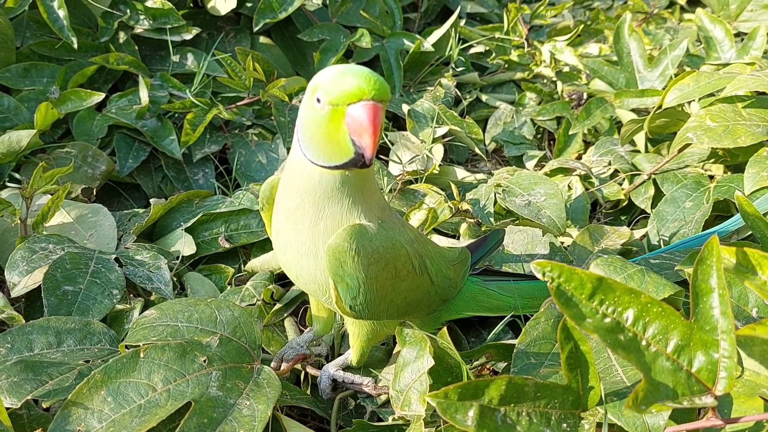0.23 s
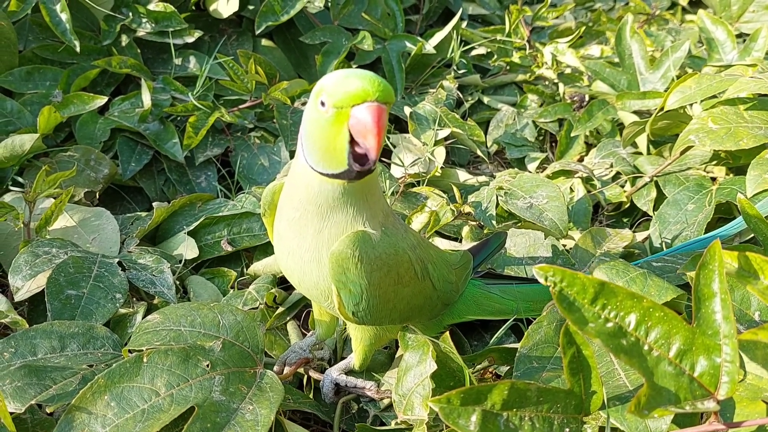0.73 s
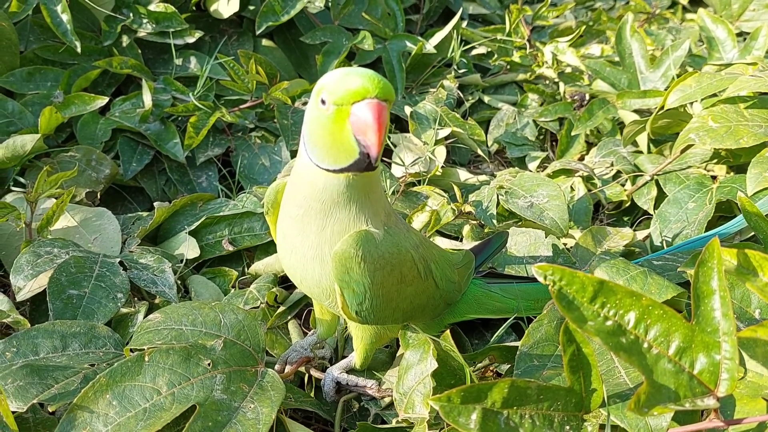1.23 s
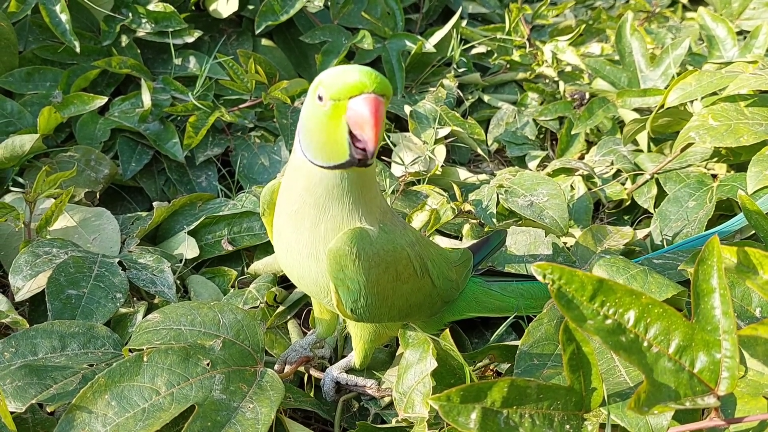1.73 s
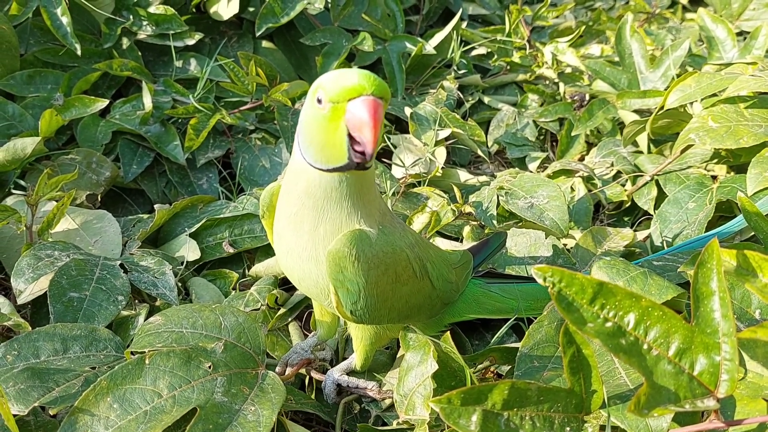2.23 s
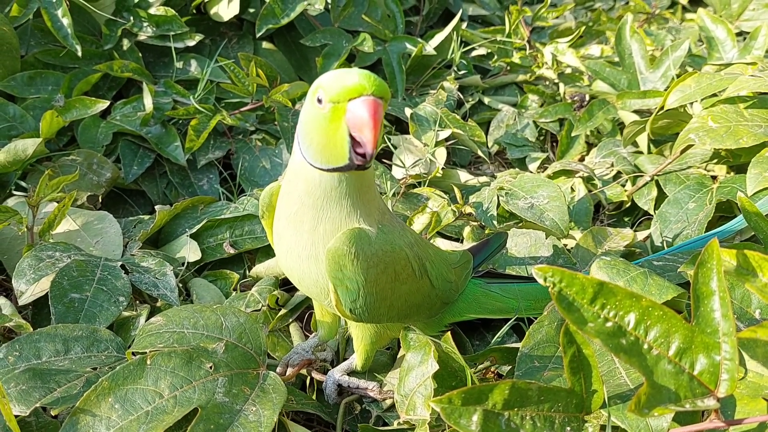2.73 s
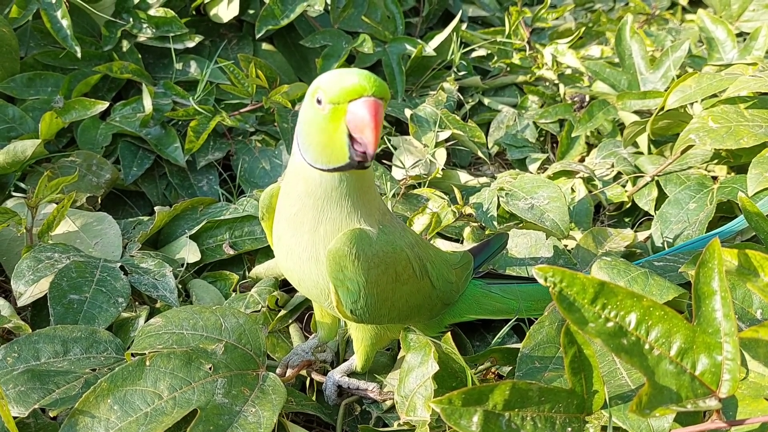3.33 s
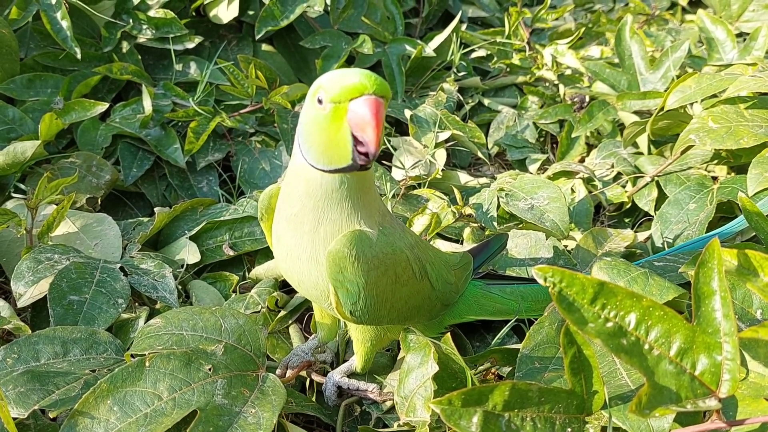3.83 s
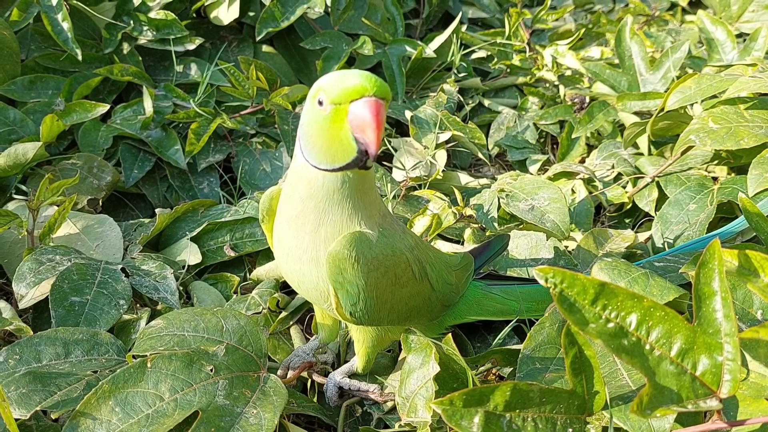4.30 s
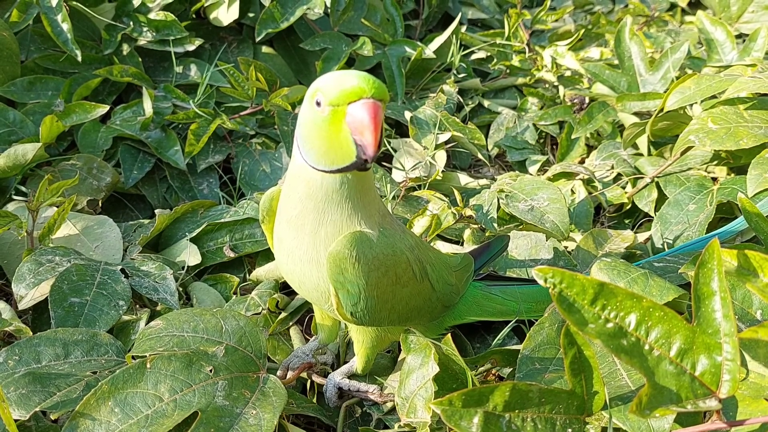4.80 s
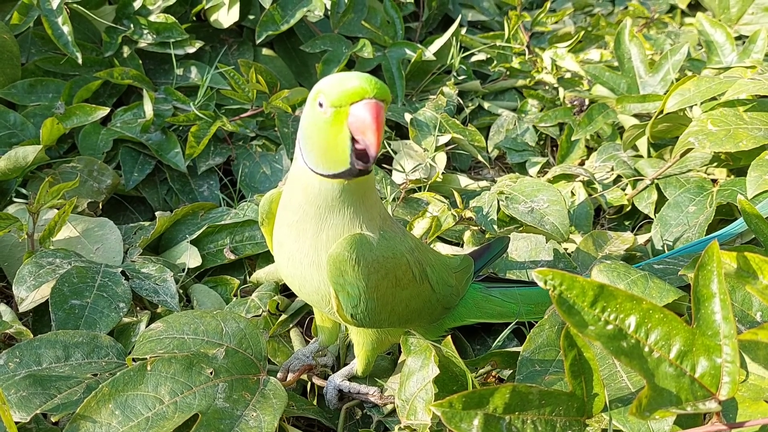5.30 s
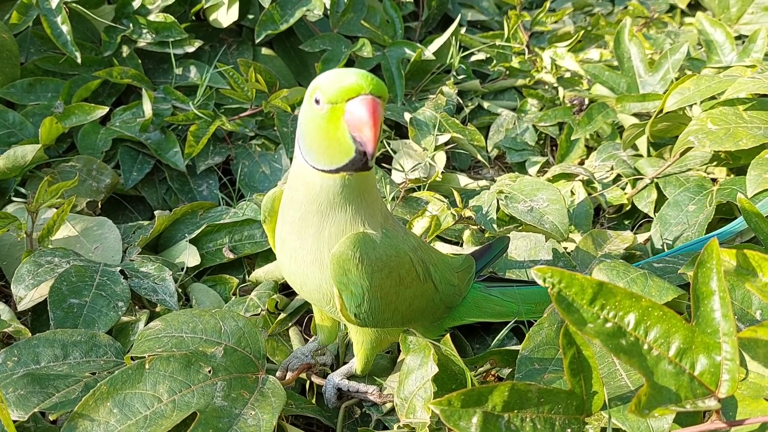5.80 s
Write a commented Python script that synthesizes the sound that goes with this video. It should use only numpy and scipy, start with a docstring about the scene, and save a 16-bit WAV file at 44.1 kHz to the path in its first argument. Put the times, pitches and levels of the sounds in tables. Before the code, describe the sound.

Outdoors among leaves, faint rustling and distant bird whistles open the scene. A close parakeet calls softly, upward then long and sagging, screeches once, and fires off a dozen sharp descending squawks about four per second, with beak ticks between. It closes with another mellow two-part call while a far bird screeches hoarsely. Traffic murmurs low underneath; the small stereo camera microphone sounds close and nearly dry.

```python
"""Two mellow rising-then-drawn-out calls of a close parakeet frame a stuttered screech and a run of falling squawks.
Beak clicks tick between them, far birds whistle, something screeches hoarsely, leaves rustle and traffic hums.
The parakeet's voice is a fundamental plus overtones shaped by a throat; clicks are crackle that rings the mouth.
Far birds are gliding sine waves, engines are wavering low tones, and leaves, roar and air are coloured noise.
All of it reaches a two-port camera microphone in a bush, with short echoes."""
import sys
import numpy as np
from scipy import signal
from scipy.fft import rfft, irfft, next_fast_len
from scipy.io import wavfile
from scipy.ndimage import map_coordinates

SR = 44100
rng = np.random.default_rng(int(sys.argv[2]) if len(sys.argv) > 2 else 0)


def output_pcm(signal):
    """Save a mono or channel-first signal as 16-bit PCM at the path in sys.argv[1].

    Samples are clipped to [-1, 1] before scaling.
    """
    pcm = np.clip(np.atleast_2d(signal).T, -1, 1) * 32767
    wavfile.write(sys.argv[1], SR, np.round(pcm).astype(np.int16))


N = 266893
T = np.arange(N) / SR  # time of every sample, in seconds

# Levels in the tables are relative: the mix adds its own gains.

# Rising mellow calls, beak a little open. Each row: start in seconds, length in seconds, top pitch in Hz, level in dB.
RISES = [(0.47, .158, 886.7, -20.5), (5.069, .162, 897.4, -20)]
# Shape of every rising call. Each row: share of the length, pitch over the top pitch, effort relative to the level in dB.
RISE_SHAPE = [(0, .44, -49.5), (.2, .68, -43), (.26, .8, -44.5), (0.312, 0.91, -40), (.45, .89, -24),
              (0.621, 0.93, -6), (.9, 1, -1), (0.949, 0.95, -10.5), (1, 1, -36.5)]
# Drawn-out mellow calls, beak nearly shut, one list per call. Each row: time in seconds, pitch in Hz.
DRAWN = [
    [(0.786, 960.6), (0.792, 958), (0.822, 852.5), (0.836, 839.3), (0.876, 759), (0.986, 712),
     (1.056, 735.2), (1.12, 735), (1.176, 710.2), (1.208, 633)],
    [(5.385, 862.3), (5.443, 774.2), (5.495, 724.3), (5.563, 698.7), (5.609, 707.7), (5.721, 735.6),
     (5.757, 715), (5.767, 704), (5.788, 639.4)],
]
# How slowly each drawn-out call swells in: one time constant per call, in seconds.
DRAWN_ATTACK_S = [.008, .05]
# In drawn-out calls effort follows pitch: level at the resting pitch, slope, highest level, softening at the start.
REST_HZ, REST_DB, EFFORT_DB_PER_HZ, FULL_DB, ATTACK_DB = 738.8, -25, 0.11, -19.5, 14
# The fundamental of a mellow call moves less than the effort; softer notes are rougher.
FIRST_DB, FIRST_FOLLOWS, FIRST_LEAST_DB = -44, 0.49, -61
MELLOW_ROUGH, SOFT_ROUGH_PER_DB = .05, 0.05

# The screech, beak open: a thin rising lead, then a falling end.
# Each row: time in seconds, pitch in Hz, fundamental in dB, overtones in dB, roughness from 0 to 1.
SCREECH = [
    [(1.424, 2554, -62.5, -42.5, .3), (1.432, 3405, -52.5, -33.5, .3), (1.441, 4500, -50, -46, .3)],
    [(1.471, 1986, -23.5, -14, .3), (1.478, 1498, -28, -9.5, .2), (1.488, 1269, -30, -5, .25),
     (1.497, 1200, -24, -8.5, .25), (1.505, 817, -41.5, -10, 0.3), (1.511, 552.4, -35.5, -21, 0.7),
     (1.522, 407, -39.5, -28.5, .5), (1.53, 379.2, -53, -25.5, .5)],
]
# Stutters inside the screech, each an arch in pitch and level.
# Each row: start in seconds, length in seconds, top pitch in Hz, level in dB, how much lower the edges are in dB.
STUTTERS = [(1.445, .012, 2357, -0.5, 23.5), (1.459, .01, 2239, -9, 4)]
STUTTER_EDGE, STUTTER_FIRST_DB = .62, -18.5  # edge pitch over top pitch; fundamental against overtones

# Squawks with their clicks. Each row: start in seconds, how long the top is held in seconds, length in seconds,
# top pitch in Hz, bottom pitch in Hz, level in dB, seconds from beak snap to squawk, snap in dB,
# seconds from tick to squawk, tick in dB.
SQUAWKS = [(1.7037, .0063, 0.078, 2546, 818, -24.5, .0348, -23.5, .0053, -26),
           (1.957, .0097, 0.084, 2456, 863.3, -24.5, .0314, -31, 0.0029, -22.5),
           (2.2162, .0098, 0.076, 2506, 767.6, -26.5, .0358, -35.5, .0051, -28.5),
           (2.478, .0059, .077, 2468, 759.7, -25.5, .0405, -25.5, .007, -23),
           (2.7442, .0088, 0.082, 2482, 781.4, -23.5, .0379, -35, 0.0089, -26.5),
           (3.0125, .0104, .081, 2444, 816.8, -23.5, .0348, -28, .0064, -25),
           (3.2896, .0085, .086, 2436, 828.8, -24.5, .0382, -30, .0086, -23.5),
           (3.5615, .0088, .082, 2476, 821, -24.5, .0419, -40.5, .0059, -24.5),
           (3.8644, .0079, .081, 2569, 819.2, -23.5, .0346, -26.5, .006, -34),
           (4.153, .0099, 0.086, 2568, 831.8, -23.5, .036, -32, .0063, -27),
           (4.4346, .011, 0.085, 2436, 829.5, -22, .0365, -30, .0039, -19),
           (4.7061, .0083, 0.083, 2482, 813.5, -22.5, .0342, -30, 0.0065, -23)]
# Shape of every squawk. Each row: share of the glide time, share of the pitch drop, fundamental in dB,
# overtones in dB, roughness from 0 to 1.
GLIDE = [(-.15, -.01, 0, 4.5, .06), (0, .014, 0.5, 6, .06), (.06, .055, 1, 6, .1), (.12, .13, -11, 0.5, .1),
         (.3, .39, -8.5, 7, .3), (.58, .65, -11, 4.5, .35), (.7, .73, -10, 4, .4), (.8, .84, -13.5, -1, .5),
         (1, .93, -17.5, -1, .5), (1.2, 0.95, -10.5, -6, .4)]
GLIDE_S = .065  # time a squawk takes to fall

# Throat response with the beak open. Each row: frequency in Hz, gain in dB.
OPEN = [(500, -40.5), (1800, -21), (2500, -14), (3400, -5.5), (4100, -17), (4900, 0), (6000, -14.5),
        (7300, -20.5), (8800, -34), (10000, -28.5), (12000, -42), (14500, -44.5), (16000, -52.5)]
# Throat response with the beak nearly shut. Each row: frequency in Hz, gain in dB.
SHUT = [(500, -16), (1450, -9), (1900, -5), (2550, 4), (3050, -23.5), (3700, -24.5), (4400, -23),
        (4950, -34), (5400, -32.5), (6200, -30.5), (7400, -28.5), (9000, -34.5), (12000, -47.5),
        (16000, -54)]
# Throat response of the rising calls, beak a little more open. Each row: frequency in Hz, gain in dB.
AJAR = [(500, -13.5), (1300, -6), (1900, -10.5), (2550, 4), (3050, -18.5), (3550, -9.5), (4400, -27),
        (5300, -14), (6200, -28.5), (7200, -21.5), (9000, -39.5), (16000, -56)]
# Air rushing through the open beak. Each row: frequency in Hz, level against the overtones in dB.
OPEN_AIR = [(1000, -68), (6000, -42), (10500, -35.5), (13000, -41.5), (15000, -41.5), (16500, -51)]
# Air rushing through the nearly shut beak. Each row: frequency in Hz, level against the overtones in dB.
SHUT_AIR = [(1000, -46), (3500, -35), (5000, -29), (7000, -46.5), (9000, -42.5), (11500, -43), (13000, -70),
            (16500, -73.5)]

# Short chips before the drawn-out calls. Each row: start in seconds, start pitch in Hz, end pitch in Hz,
# length in seconds, level in dB.
CHIPS = [(0.7645, 2093, 3196, 0.0055, -11), (5.356, 2560, 2476, 0.0035, -12)]
# Beak clicks apart from the snaps and ticks. Each row: time in seconds, level in dB, brightness in dB.
CLICKS = [(0.7647, -21, -1), (1.2728, -52, 4), (1.3718, -57, -5), (1.4248, -40, 8.5), (1.6294, -49, 7),
          (1.8235, -53, 8), (1.8593, -44, 11), (2.1199, -49, 1), (2.3612, -50.5, 5), (2.5925, -49, -1),
          (2.6433, -46, 18), (2.922, -53, 14.5), (3.1284, -47, -8.5), (3.1721, -52, 10), (3.4047, -48, -16),
          (3.4163, -43.5, -14), (3.6545, -37, -4), (3.7154, -52.5, 10), (4.2492, -32, -7),
          (4.5531, -45.5, -12.5), (4.8296, -49, -6), (4.8764, -49, 10.5), (5.332, -27.5, -3),
          (5.3556, -20.5, -7.5), (5.8384, -51, 0.5)]
# Resonances of the mouth. Each row: frequency in Hz, width in Hz, gain in dB.
MOUTH_MODES = [(422, 110, -6), (1173, 150, -3), (1620, 170, -2.5), (2500, 170, -2.5), (3390, 220, -1.5),
               (4320, 120, -4.5), (4400, 540, -2.5), (5950, 280, -6.5), (7400, 340, 6), (9500, 1500, -14.5)]
SNAP_BRIGHT_DB, TICK_LOW_DB, TICK_HIGH_DB = -8.5, -22, -22
TICK_LOW_DB = -22.5
LOW_PART_DB, HIGH_PART_DB = -15, -17  # at brightness 0; brighter clicks trade low for high

# A clear far bird, arched notes. Each row: start in seconds, length in seconds, start, middle and end pitch in Hz,
# loudest moment as a share of the length, then the level of four partials in dB.
PIPES = [(0, .275, 1467, 1497, 1518, 0.57, -54, -100, -87, -100),
         (0.628, 0.16, 1262, 1370, 1296, 0.38, -60, -75, -88, -110),
         (1.535, .055, 1531, 1400, 1200, 0.33, -66, -57.5, -89, -88),
         (2.045, 0.13, 1297, 1360, 1276, 0.31, -62.5, -90, -72.5, -85),
         (2.34, 0.12, 1078, 1363, 1330, 0.74, -61.5, -77.5, -63.5, -76),
         (3.48, 0.073, 1101, 1150, 1201, 0.53, -71.5, -90, -74, -100),
         (3.77, 0.054, 1055, 1072, 1082, 0.48, -72, -90, -95, -100),
         (4.111, .035, 1201, 1160, 1133, 0.29, -71, -85, -82.5, -100)]
# The hoarser far bird, arched notes. Each row: start in seconds, length in seconds, start, middle and end pitch in Hz,
# loudest moment as a share of the length, then the level of three partials in dB.
SLURS = [(.625, .04, 3550, 3507, 3457, .2, -58.5, -91.5, -100),
         (1.17, .024, 1502, 1800, 1923, 0.91, -77, -62.5, -90),
         (1.194, 0.14, 1924, 1694, 1300, 0.26, -64.5, -60.5, -92),
         (1.56, 0.054, 2023, 1870, 1702, .4, -93, -62.5, -88.5),
         (3.455, 0.056, 1830, 1740, 1664, .2, -97, -67.5, -98),
         (4.975, 0.05, 3590, 3530, 3240, 0.87, -52, -78, -100),
         (5.24, 0.066, 1314, 2490, 2350, 0.74, -54.5, -73, -96)]
NOTE_FADE_DB = 11.5  # arched notes: softer by this much one length away from the loudest moment
# Far calls that drop to a step and fall off it. Each row: start in seconds, length in seconds, step pitch in Hz,
# then the level of three partials in dB.
DROPS = [(0.657, 0.096, 1896, -58, -50.5, -97), (.938, 0.11, 1830, -52.5, -50, -98),
         (5.026, .098, 1900, -56, -49.5, -70), (5.303, 0.089, 1844, -56, -51, -76)]
# Shape of every dropping call. Each row: share of the length, pitch over the step pitch.
DROP_SHAPE = [(0, 1.24), (.12, 1.1), (.3, 1), (.8, .97), (1, 0.76)]
NOTE_EDGE_DB = 7  # dropping calls are this much softer at both ends

# A far hoarse screech: hiss, low band and high band. Each row: start of the loudest part in seconds, level in dB,
# swell in dB per second, fade in dB per second, how long it holds in seconds.
RASP = [(5.62, -43, 134, 349, 0.18), (5.648, -43, 75.5, 140, 0.11), (5.62, -39.5, 221, 140, 0.036)]
# Colour of its hiss. Each row: frequency in Hz, gain in dB.
RASP_COLOUR = [(500, -34), (1200, -10.5), (2300, -1), (2800, -17), (3400, -15), (4800, -11), (6200, -25),
               (9000, -31.5), (11500, -35), (13000, -63), (16000, -89)]
# Colours of its low and high band, one list each. Each row: frequency in Hz, gain in dB.
RASP_BANDS = [
    [(900, -93), (1500, -47.5), (2100, -6), (2350, 2.5), (2650, -7), (3400, -50), (5000, -91)],
    [(1600, -88), (2400, -40), (3000, -6), (3400, -3), (3750, -7), (4600, -33), (6500, -88)],
]
# Bursts of leaf rustle. Each row: start in seconds, length in seconds, level in dB.
RUSTLE = [(0, 0.067, -77), (0.07, 0.045, -71), (0.139, 0.036, -69.5), (0.175, 0.046, -70),
          (.24, .04, -75.5), (0.287, 0.031, -72), (0.338, .028, -69.5)]
# Colour of the leaves. Each row: frequency in Hz, gain in dB.
LEAVES = [(2060, -55.5), (3500, -29), (4360, -26), (4440, -4), (4900, -25), (5800, -19), (5970, -13),
          (8260, 1.5), (10500, -23.5), (14000, -22.5)]

# Traffic rumble over time. Each row: time in seconds, level in dB.
TRAFFIC = [(0.0, -62), (1.01, -60.5), (1.28, -64), (1.6, -63), (2.34, -68.5), (2.88, -69.5), (3.18, -63.5),
           (3.62, -69.5), (4.31, -63), (4.57, -69.5), (5.61, -58), (6.05, -67.5)]
# Colour of the rumble. Each row: frequency in Hz, gain in dB.
RUMBLE = [(21, -46), (35, -6), (97, 0.5), (198, -10), (263, -24), (301, -26), (369, -34.5), (400, -31),
          (520, -49.5), (880, -120)]
# An engine that speeds up, then slows. Each row: time in seconds, firing rate in Hz, level in dB.
ENGINE = [(0, 45.53, -59), (0.499, 48.8, -66), (1.049, 51.67, -58.5), (1.3, 51.74, -70.5),
          (1.598, 53, -63.5), (1.73, 51.2, -55), (2, 47.1, -80)]
# Multiples of the firing rate that are heard. Each row: multiple, level in dB.
ENGINE_ORDERS = [(2, -0.5), (3, -6.5), (4, -11.5)]
# Hums of farther engines, in two groups. Each row: start in seconds, length in seconds, pitch in Hz, level in dB.
HUMS = [
    [(0, 2.85, 121.2, -73), (2.9, 0.64, 121, -67.5), (3.8, 0.8, 124, -66), (4.6, 1.447, 121, -67.5)],
    [(1.97, 0.214, 157, -58.5), (4.85, 1.186, 173, -66.5)],
]
ROAR_DB, PASS_S, PASS_WIDE_S, PASS_DB = -79, 4.42, 0.14, 20  # a roar that swells once: when, how wide, how much
# Colour of the quiet air. Each row: frequency in Hz, gain in dB.
AIR = [(180, -15.5), (300, 5), (645, -7.5), (1300, -1.5), (1930, -9.5), (3240, -14.5), (4750, -13),
       (5520, -16), (8360, -11.5), (10600, -20), (16000, -19)]
AIR_DB = -72

# Shading between the ports. Each row: frequency in Hz, left over right in dB.
SHADE = [(300, 5.5), (1400, -1.5), (2400, 7.5), (3100, 5.5), (3800, 24), (4500, 5), (5900, 9), (8000, 7),
         (10000, 0.5), (11400, 10), (14000, -2)]
# Lead of the left port. Each row: frequency in Hz, phase lead in radians.
LEAD = [(0, 0), (1000, 1.1), (1700, 2), (2400, 2.7), (3400, 3.1), (5200, 4.4), (6500, 5), (8600, 7.4),
        (11400, 8.5), (16000, 12)]
# Echo of the bush. Each row: frequency in Hz, time to die away by 60 dB in seconds.
BUSH = [(500, 0.078), (2000, .14), (5000, 0.1), (12000, 0.031)]
# A fainter, longer answer from farther off. Each row: frequency in Hz, time to die away by 60 dB in seconds.
WALLS = [(800, .25), (3000, 0.38), (8000, .25)]
# Echo around the far birds. Each row: frequency in Hz, time to die away by 60 dB in seconds.
GARDEN = [(500, .08), (1600, .1), (4000, .22), (12000, .15)]
TOP_HZ = 16200  # band limit of the camera


def amp(db):
    """Turn dB into gain."""
    return 10 ** (np.asarray(db) / 20)


def unit(x):
    """Scale to an average (rms) strength of 1."""
    return x / np.sqrt(np.mean(x ** 2) + 1e-20)


def along(points, hz):
    """Read a curve of (Hz, value) points on a logarithmic frequency axis."""
    f, v = np.transpose(points)
    return np.interp(np.log(hz + 1), np.log(f + 1), v)


def filtered(x, response):
    """Filter x by multiplying its spectrum with a response, a function of frequency."""
    size = next_fast_len(N + 8192)  # spare room at the end for ringing
    return irfft(rfft(x, size) * response(np.fft.rfftfreq(size, 1 / SR)), size)[..., :N]


def causal(points):
    """A response that follows the (Hz, dB) points and rings only after the sound (minimum phase)."""
    def response(hz):
        cepstrum = irfft(np.log(amp(along(points, hz))))
        half = len(cepstrum) // 2
        cepstrum[1:half] *= 2
        cepstrum[half + 1:] = 0
        return np.interp(hz, np.linspace(0, SR / 2, half + 1), np.exp(rfft(cepstrum)))
    return response


def wobble(rate):
    """A smooth random curve with this many random points a second."""
    return map_coordinates(rng.standard_normal(int(N * rate / SR) + 4), [T * rate])


def noise(colour, channels=1):
    """Coloured noise of rms 1."""
    white = rng.standard_normal((channels, N))
    return unit(filtered(white, lambda hz: amp(along(colour, hz))))


def turning(hz):
    """The phase of a tone whose pitch changes: it turns faster when the pitch is higher."""
    return 2 * np.pi * np.cumsum(hz) / SR


def played(notes, fade):
    """A gate that is open during the notes, and each note column as one value per sample."""
    s, *columns = np.transpose(np.concatenate(notes))
    gate = sum(np.clip(np.minimum(T - n[0][0], n[-1][0] - T) / fade, 0, 1) for n in notes)
    return gate, [np.interp(T, s, column) for column in columns]


def voice(notes, throat, air, fade, jitter, breathy, crisp_hz, spread):
    """The syrinx: a strong fundamental, and a pulse each cycle that rings the throat; rough pulses scatter and hiss."""
    gate, (hz, first_db, over_db, rough) = played(notes, fade)
    rough = np.clip(rough, 0, 1)
    phase = turning(hz * (1 + jitter * rough * wobble(500) + .05 * rough * wobble(110)))
    on = gate > 0
    pulses = np.zeros(N)
    # the membranes close gradually: the pulse is drawn out, and its top is lost in the hiss
    unsteady = wobble(45)
    for k in range(2, 16):
        drift = amp(.5 * (k - 1) * np.roll(unsteady, 9001 * k)[on])  # higher partials fade in and out more
        rolloff = 1 + (k * hz[on] / crisp_hz) ** 10
        pulses[on] += drift * np.cos(k * phase[on] + spread * k * k) / rolloff
    hiss = breathy * rng.standard_normal(N) * (1 + 1.5 * np.cos(phase))  # air bursts once a cycle
    source = pulses * (1 + .6 * rough * wobble(900)) + rough * hiss
    first = amp(first_db) * (1 + 0.15 * rough * wobble(400)) * np.sqrt(2) * np.cos(phase)
    effort = gate * amp(over_db)
    rush = filtered(effort * rng.standard_normal(N), lambda f: amp(along(air, f)))
    return gate * first + filtered(effort * source, causal(throat)) + rush


def mellow_note(s, hz, effort_db):
    """A mellow note: its fundamental and roughness follow from the effort."""
    first_db = np.maximum(FIRST_DB + FIRST_FOLLOWS * (effort_db - REST_DB), FIRST_LEAST_DB)
    rough = np.clip(MELLOW_ROUGH + SOFT_ROUGH_PER_DB * (REST_DB - effort_db), .03, .1)
    return np.transpose([s, hz, first_db, effort_db, rough])


def mellow_calls():
    """Each rising call is followed by a drawn-out one whose effort follows its pitch."""
    u, pitch, below_db = np.transpose(RISE_SHAPE)
    notes = []
    for (s, length, top_hz, db), drawn, attack in zip(RISES, DRAWN, DRAWN_ATTACK_S):
        t = np.linspace(drawn[0][0], drawn[-1][0], num=80)
        hz = np.interp(t, *np.transpose(drawn))
        effort_db = np.minimum(REST_DB + EFFORT_DB_PER_HZ * (hz - REST_HZ), FULL_DB)
        effort_db = effort_db - ATTACK_DB * np.exp((t[0] - t) / attack)
        notes.append(mellow_note(s + u * length, top_hz * pitch, db + below_db))
        notes.append(mellow_note(t, hz, effort_db))
    return notes


def stutter(s, length, top_hz, db, edge_db):
    """One short burst of the screech: pitch and level arch up and down, rougher at the edges."""
    edge = np.array([1, 0, 1])
    t = s + length * np.array([0, .5, 1])
    over_db = db - edge_db * edge
    return np.transpose([t, top_hz * STUTTER_EDGE ** edge, over_db + STUTTER_FIRST_DB, over_db, .25 + .15 * edge])


def squawk(s, held, length, top_hz, bottom_hz, db):
    """One squawk as a note: a held top, then the shared falling shape, swelling in and choked off."""
    t = np.linspace(-.003, length + 0.0043, num=90)
    u, *shape = np.transpose(GLIDE)
    drop, first_db, over_db, rough = (np.interp((t - held) / GLIDE_S, u, column) for column in shape)
    swell_db = 18 * np.clip(1 - (t + 0.0013) / 0.0014, 0, 1) ** 2
    choke_db = 24 * np.clip(1 - (length + 0.0031 - t) / 0.02, 0, 1) ** 2
    level_db = db - swell_db - choke_db
    hz = top_hz * (bottom_hz / top_hz) ** drop
    return np.transpose([s + t, hz, first_db + level_db, over_db + level_db, rough])


def parakeet():
    """Mellow calls ring the nearly shut beak; the screech and squawks ring the open one."""
    calls = mellow_calls()  # rising and drawn-out ones take turns
    mellow = sum(voice(calls[k::2], throat, SHUT_AIR, fade=.005, jitter=0.066, breathy=2.47, crisp_hz=5288, spread=0.19)
                 for k, throat in enumerate((AJAR, SHUT)))
    harsh_notes = SCREECH[:1] + [stutter(*row) for row in STUTTERS] + SCREECH[1:]
    harsh_notes = harsh_notes + [squawk(*row[:6]) for row in SQUAWKS]
    harsh = voice(harsh_notes, OPEN, OPEN_AIR, fade=0.00082, jitter=0.051, breathy=3.6, crisp_hz=9160, spread=0.38)
    return amp(4) * mellow + amp(1.5) * harsh


def chips():
    """Each chip is a single swelling and dying glide with a weak second partial."""
    out = np.zeros(N)
    for s, start_hz, end_hz, length, db in CHIPS:
        u = np.linspace(0, 1, round(length * SR))
        phase = turning(start_hz + (end_hz - start_hz) * u)
        swell = np.sin(np.pi * u ** 1.2) ** 0.57
        out[round(s * SR):][:len(u)] += amp(db) * swell * (np.sin(phase) + 0.13 * np.sin(2 * phase))
    return out


def clicks():
    """All clicks as (time, level, low part, high part): a dull snap and a tick lead into every squawk."""
    snaps = [(s - before, db, SNAP_BRIGHT_DB) for s, *_, before, db, _, _ in SQUAWKS]
    ticks = [(s - before, db, TICK_LOW_DB, TICK_HIGH_DB) for s, *_, before, db in SQUAWKS]
    return [(s, db, LOW_PART_DB - bright, HIGH_PART_DB + bright) for s, db, bright in CLICKS + snaps] + ticks


def beak():
    """Each click is a faint creak, then a brief dying crackle that rings the low, middle and high modes of the mouth."""
    s, db, low_db, high_db = np.transpose(clicks())
    t = np.arange(-130, 260) / SR
    envelope_db = np.where(t < 0, -20 + 2500 * t, -60 * t / 0.0038)
    crackle = rng.standard_normal((len(s), len(t))) * amp(envelope_db)
    at = np.round((s[:, None] + t) * SR).astype(int).ravel()
    low, middle, high = MOUTH_MODES[:3], MOUTH_MODES[3:8], MOUTH_MODES[8:]
    out = 0
    for level, modes in ((db + low_db + 23.5, low), (db + 17.0, middle), (db + high_db + 20.0, high)):
        def ring(f):
            # neighbouring modes have opposite signs
            return sum((-1) ** k * amp(gain) * 1j * f * width / (centre ** 2 - f * f + 1j * f * width)
                       for k, (centre, width, gain) in enumerate(modes))
        struck = np.bincount(at, (amp(level)[:, None] * crackle).ravel(), N)
        out = out + filtered(struck, ring)
    return out


def arched(s, length, start_hz, mid_hz, end_hz, loudest, *levels):
    """A note whose pitch bends smoothly through three values."""
    u = np.linspace(-1, 1, num=15)
    share = (u + 1) / 2
    hz = mid_hz + (end_hz - start_hz) / 2 * u + ((start_hz + end_hz) / 2 - mid_hz) * u ** 2
    return np.transpose([s + length * share, hz] + [db - NOTE_FADE_DB * np.abs(share - loudest) for db in levels])


def dropped(s, length, step_hz, *levels):
    """A note with the shared stepped fall."""
    u, pitch = np.transpose(DROP_SHAPE)
    return np.transpose([s + length * u, step_hz * pitch] + [db - NOTE_EDGE_DB * (2 * u - 1) ** 2 for db in levels])


def far_bird(notes, haze):
    """A slightly unsteady, hoarse whistle with overtones that flutter through the foliage."""
    gate, (hz, *levels) = played(notes, .008)
    phase = turning(hz * (1 + .005 * wobble(150)))
    hoarse = 1 + haze * wobble(1400)  # spreads a haze around each partial
    partials = sum(np.sqrt(2) * amp(db + 1.5 * wobble(60)) * np.sin(k * phase) for k, db in enumerate(levels, 1))
    return gate * hoarse * partials


def far_birds():
    """A clear piping bird and a hoarser one."""
    clear = far_bird([arched(*n) for n in PIPES], haze=.06)
    slurred = far_bird([arched(*n) for n in SLURS], haze=0.34)
    stepped = far_bird([dropped(*n) for n in DROPS], haze=0.39)
    return clear + slurred + stepped


def hoarse_screech():
    """A far hoarse screech: three bands of noise that each swell, hold and fade."""
    out = 0
    for (s, db, swell, fade, held), colour in zip(RASP, [RASP_COLOUR] + RASP_BANDS):
        level_db = db - swell * np.clip(s - T, 0, None) - fade * np.clip(T - s - held, 0, None)
        out = out + amp(level_db) * noise(colour)[0]
    return out


def leaves():
    """Leaves rustle in quick bursts of flickering noise."""
    bursts = sum(amp(db) * np.clip(np.minimum(T - s, s + length - T) / .006, 0, 1) for s, length, db in RUSTLE)
    return bursts * amp(3 * wobble(60)) * noise(LEAVES)[0]


def engine(notes):
    """A low tone that wavers in pitch and level."""
    gate, (hz, db) = played(notes, 0.15)
    return gate * np.sqrt(2) * amp(db + 3.6 * wobble(8.0)) * np.sin(turning(hz * (1 + .02 * wobble(20))))


def traffic():
    """A low rumble, partly shared by the ports, with a roar and engine tones; louder at the right port."""
    shared, own = noise(RUMBLE), noise(RUMBLE, channels=2)
    rumble_db = np.interp(T, *np.transpose(TRAFFIC)) - 2 + 1.3 * wobble(8.1)
    rumble = amp(rumble_db) * (shared + 0.84 * own)
    roar_db = ROAR_DB + PASS_DB * np.exp(-((T - PASS_S) / PASS_WIDE_S) ** 2) + 4 * wobble(3.8)
    roar = amp(roar_db) * noise([(120, -43.5), (200, -2), (300, -3.5), (420, -14.5), (700, -33.5), (1400, -120)])
    near = sum(engine([[(s, k * hz, db + order_db) for s, hz, db in ENGINE]]) for k, order_db in ENGINE_ORDERS)
    hums = sum(engine([[(s, hz, db), (s + length, hz, db)] for s, length, hz, db in hum]) for hum in HUMS)
    return (rumble + roar + near + hums) * amp([[-3], [2.2]])


def quiet_air():
    """Soft noise, different at each port, that wavers slowly in level."""
    return amp(AIR_DB + 1.5 * wobble(8.4)) * noise(AIR, channels=2)


def ports(x):
    """The sound reaches the left port first; the camera body shades the right one."""
    def to_right(hz):
        return amp(-along(SHADE, hz)) * np.exp(-1j * np.interp(hz, *np.transpose(LEAD)))
    return np.array([x, filtered(x, to_right)])


def echoes(x, decay):
    """The diffuse answer of the surroundings: dying noise, unlike at the two ports, smears the sound."""
    hz, t, z = signal.stft(rng.standard_normal((2, SR // 3)), SR, nperseg=128)
    tail = signal.istft(z * amp(-60 * t / along(decay, hz)[:, None]), SR, nperseg=128)[1]
    return signal.fftconvolve(x[None], tail / np.linalg.norm(tail[0]), axes=1)[:, :N]


def scene():
    """The parakeet, its surroundings and the quiet air."""
    bird = parakeet() + chips() + beak()
    far = amp(5) * far_birds()
    direct = ports(bird + far + hoarse_screech() + leaves())
    bush = amp(-27.5) * echoes(bird, BUSH) + amp(-39.5) * echoes(bird, WALLS)
    garden = amp(-9.5) * echoes(far, GARDEN)
    return direct + bush + garden + traffic() + quiet_air()


def record(dry):
    """The loudest peaks are rounded off, and the camera keeps nothing above its band limit."""
    rounded = dry / (1 + np.abs(dry / .95) ** 6) ** (1 / 6)
    return filtered(rounded, lambda hz: hz < TOP_HZ)


dry = scene()
out = record(dry)
output_pcm(out)
```